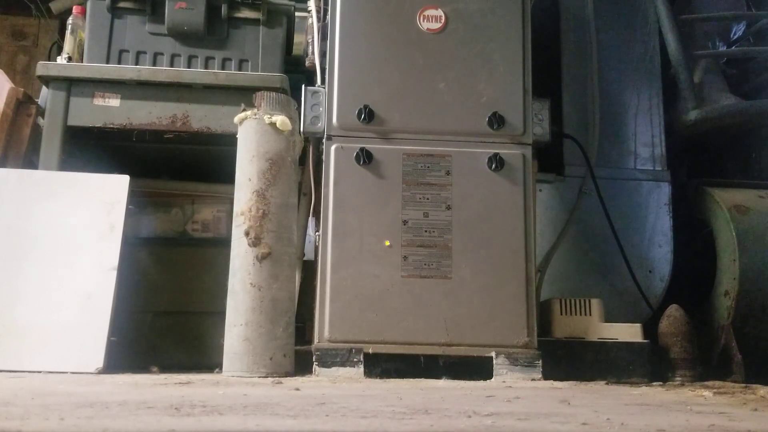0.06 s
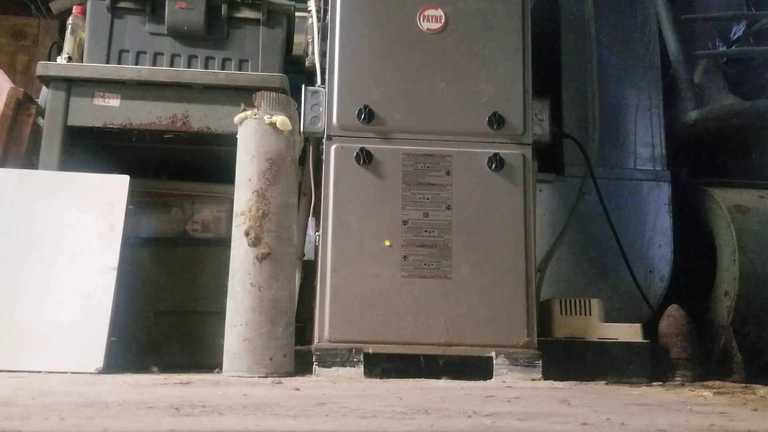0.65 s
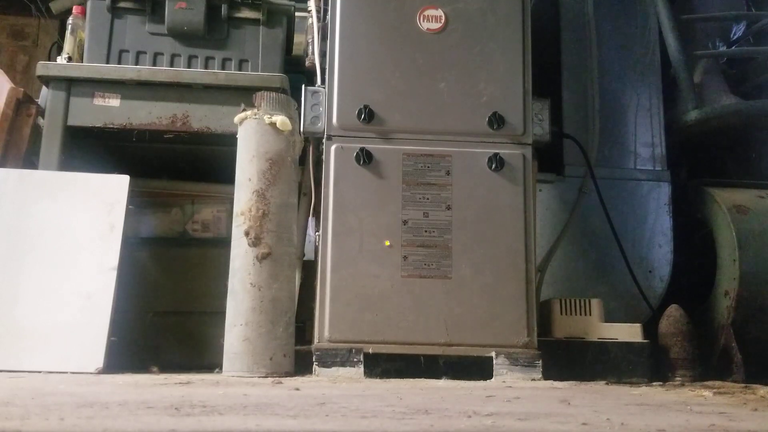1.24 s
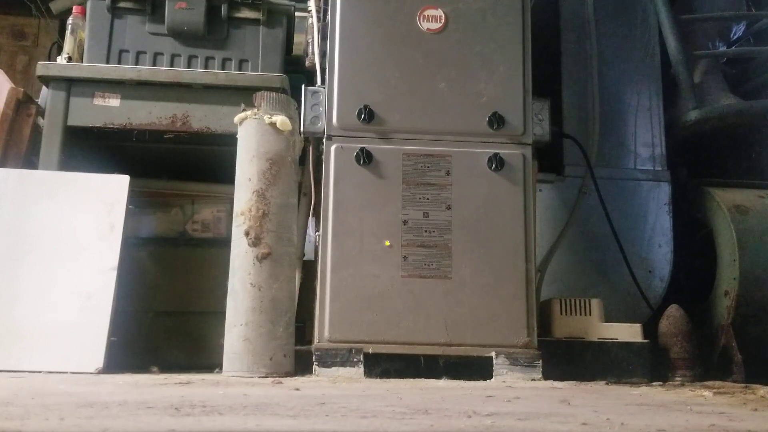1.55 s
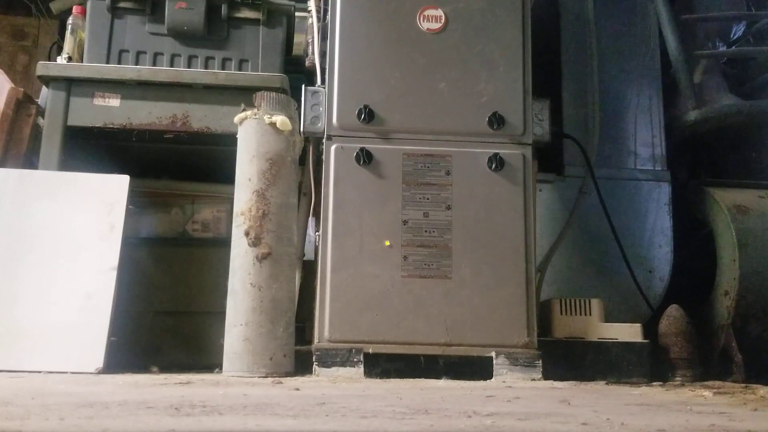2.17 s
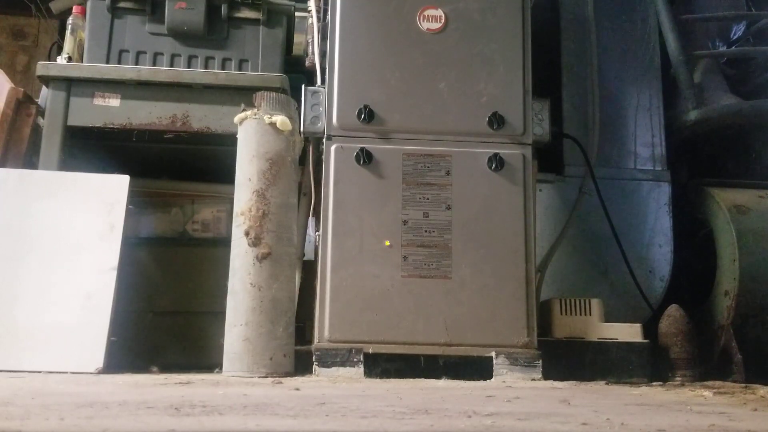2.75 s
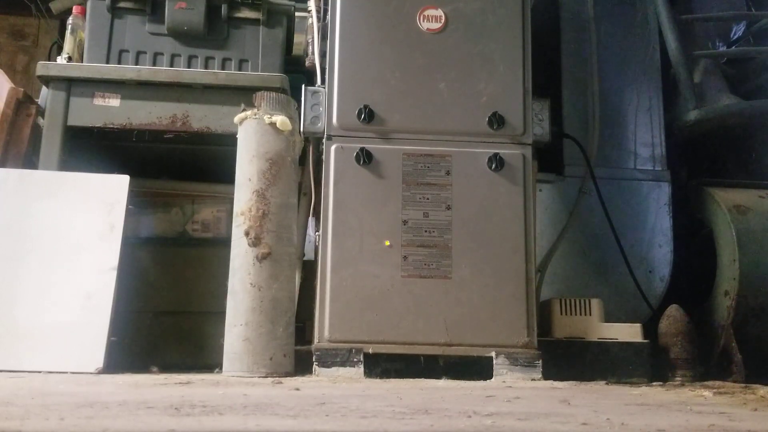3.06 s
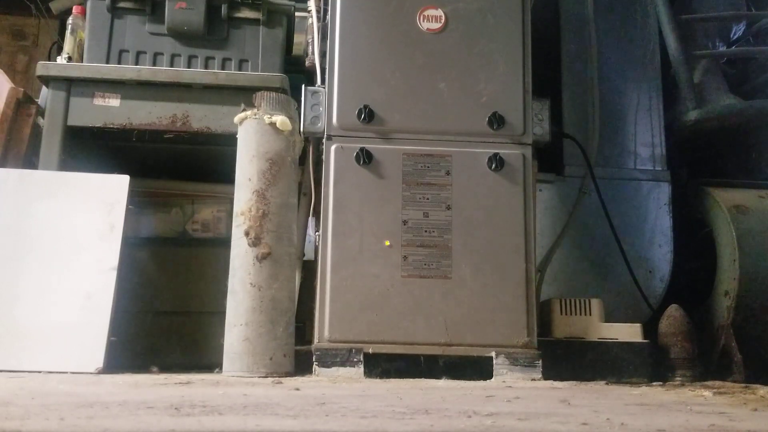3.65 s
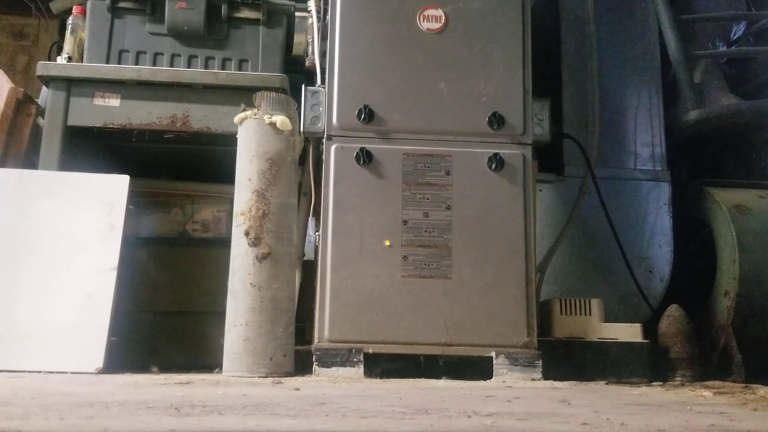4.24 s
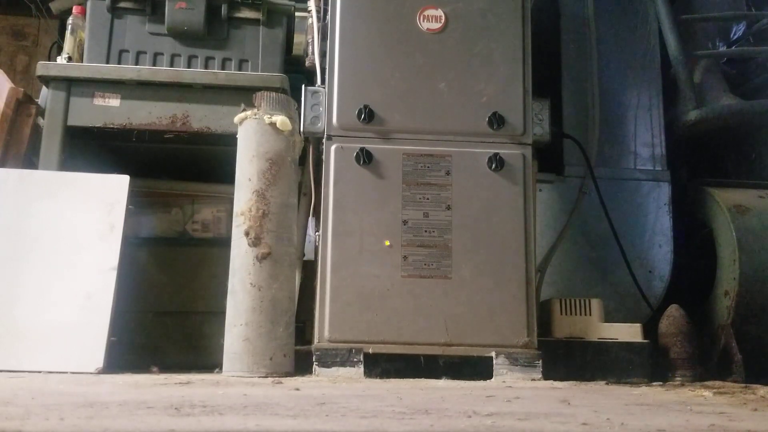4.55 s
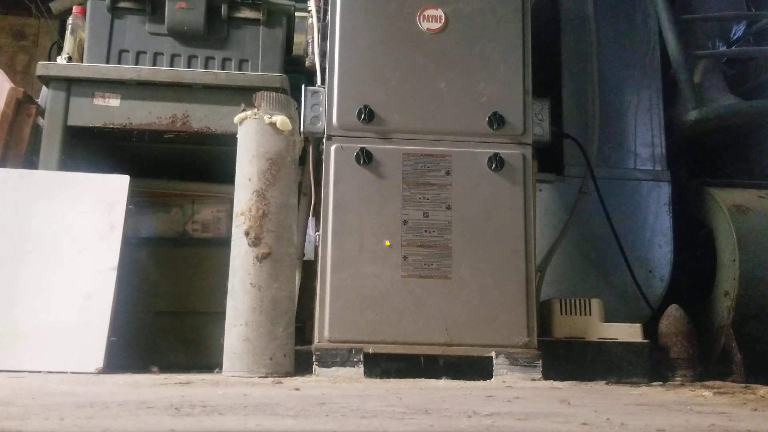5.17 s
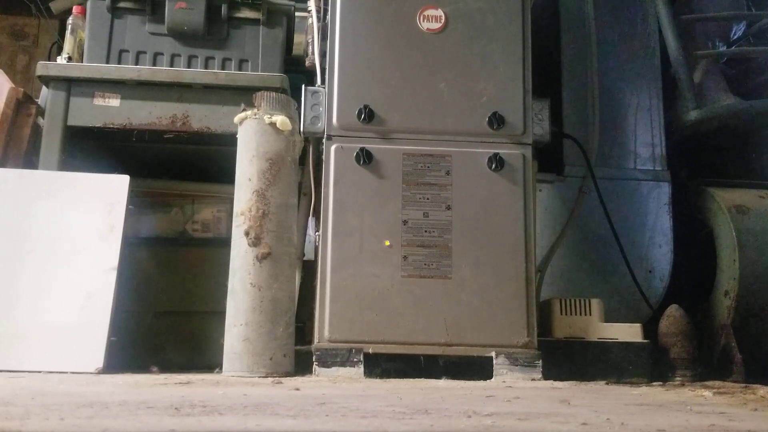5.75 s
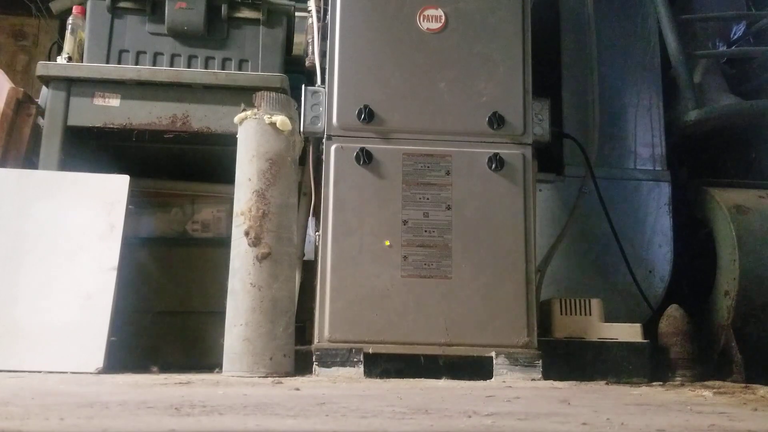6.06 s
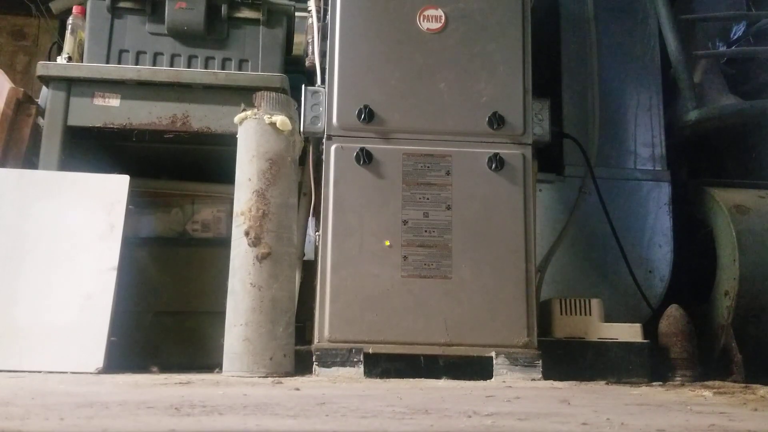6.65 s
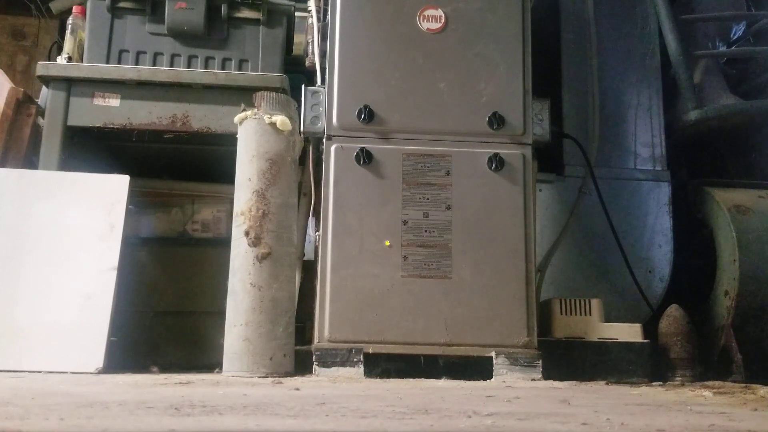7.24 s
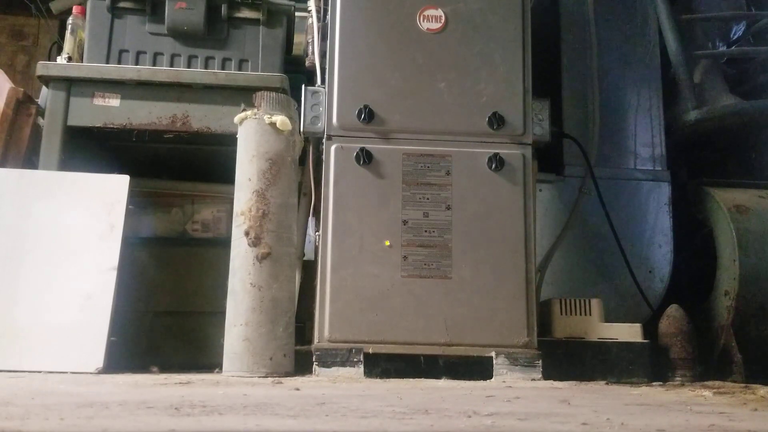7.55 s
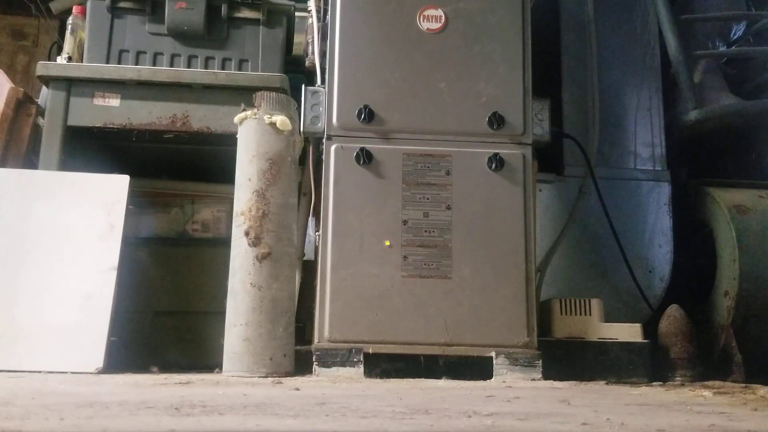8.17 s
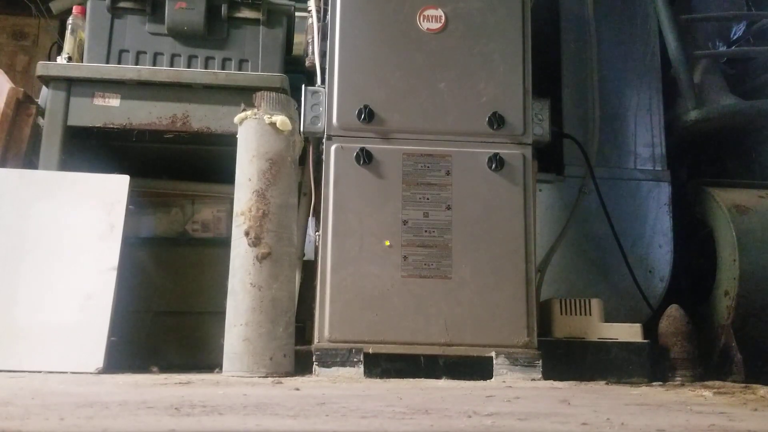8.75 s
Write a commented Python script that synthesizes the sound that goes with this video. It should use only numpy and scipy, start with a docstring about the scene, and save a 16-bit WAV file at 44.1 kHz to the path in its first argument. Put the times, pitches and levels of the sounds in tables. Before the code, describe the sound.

A gas furnace's fan hums steadily in a basement, its bearing ticking lightly over a faint hiss. A little past halfway, a relay and gas valve click, and the gas catches with a deep thump. More metallic clicks follow as the flame flares and spreads, settling into a much louder, hollow, steady roar. It is heard from the floor, a few steps away.

```python
"""Gas furnace burners light and roar in a basement, heard from the floor a few steps away.
First the draught fan hums through the flue and its bearing ticks. A relay and the gas valve click,
the jets hiss and the gas catches with a thump. The flame spreads over the burners and rings the heat
exchanger: a steady, hollow roar. Behind it, a few soft scuffs and a faint hiss."""
import sys
import numpy as np
from scipy import signal
from scipy.fft import rfft, irfft
from scipy.io import wavfile

SR = 44100
rng = np.random.default_rng(int(sys.argv[2]) if len(sys.argv) > 2 else 0)


def to_wav(sig):
    """Store sig (one row per channel, or 1-D mono) as 16-bit WAV at the path in sys.argv[1].

    Samples outside -1..1 are clipped; the rate is SR.
    """
    pcm = np.clip(np.atleast_2d(sig), -1, 1) * 32767
    pcm = np.round(pcm).astype(np.int16)
    wavfile.write(sys.argv[1], SR, pcm.T)  # frames by channels


N = 388080
T, HZ = np.arange(N) / SR, np.fft.rfftfreq(N, 1 / SR)
LIGHT_S, SPREAD_S = 5.85, 6.44  # first burner lights; flame crosses to the rest

# Stereo balance of fire and fan. Each row: frequency in Hz, left minus right in dB.
FIRE_BALANCE = [(60, -1.5), (110, -0.5), (200, 0), (380, -0.5), (700, 1), (1290, -2.5), (2380, 0),
                (4400, 2.0), (8120, -2), (15000, -2)]
FAN_BALANCE = [(60, -2), (110, -0.5), (200, 0.0), (380, 0.5), (700, 1.5), (1290, -2), (2380, -0.5),
               (4400, 4.5), (8120, 2.5), (15000, -3.5)]


def burners(rumble_hz=240, body_hz=540, top_hz=3400, flicker_db=0.87, surge_db=0.47, body_share=0.42):
    """Flames ring the heat exchanger: a rumble, then a flickering roar as they spread."""
    # Combustion noise. Each row: frequency in Hz, base density in dB per Hz.
    spectrum = [(20, -71.5), (31, -68), (42, -58), (100, -54.5), (185, -61), (215, -71.5), (330, -75.5),
                (450, -83), (700, -73), (1000, -82), (1300, -88.5), (1750, -87.5), (2000, -98.5),
                (2500, -100), (3200, -109.8)]
    # Hot exchanger modes. Each row: frequency in Hz, width in Hz, boost in dB.
    exchanger_modes = [(59.2,15.6,13), (82.6,13,7.7), (100.6,9.1,15), (120,20,10.5), (140.9,9.9,11.7),
                       (162.2,8.1,10.8), (183.8,18.6,14.4), (271,21,12), (301.7,13,16), (322,22,13.3),
                       (357.2,22.3,27.6), (392,60,17.4), (474,49,11), (503,6.6,11), (577,41,3.5),
                       (645,37,8.1), (680.7,22,15.15), (764.5,13.5,13.4), (838,12,9), (924,26,8.7),
                       (969,9.1,12.4), (1191,54,5.9), (1356,80,7.4), (1407,23,12.8), (1562,32,8.9),
                       (2057,59,6.4), (2420,98,7.1)]
    fire = air(read(spectrum, HZ) + resonances(exchanger_modes), FIRE_BALANCE)
    rumble, body, roar = (below(fire, hz) for hz in (rumble_hz, body_hz, top_hz))
    size, turbulence_db = flame()
    turbulence = gain_of(turbulence_db + flicker_db * wander(45))  # acts most on the upper bands
    flames = rumble + (body - rumble) * turbulence ** body_share + (roar - body) * turbulence
    return flames * size * gain_of(surge_db * wander(14))


def flame(first_db=-7, full_db=0.52, calm_db=-7.5, stirred_db=1.55, ease_db_per_s=0.43):
    """Flame size as a gain and turbulence in dB: one burner, then all, each step with a flare."""
    swing = 0.8 * flare(LIGHT_S) + flare(SPREAD_S)
    size_db = first_db + (full_db - first_db) * ramp(SPREAD_S, length_s=0.084) + 5.5 * swing
    size_db -= ease_db_per_s * np.maximum(T - SPREAD_S, 0)
    turbulence_db = calm_db + (stirred_db - calm_db) * ramp(SPREAD_S - 0.15, length_s=0.19) + 3.5 * swing
    return ramp(LIGHT_S, length_s=0.23) * gain_of(size_db), turbulence_db


def flare(start_s, delay_s=0.12, period_s=0.45, settle_s=0.19):
    """Gathered gas burns off: the flame overshoots, sags and settles."""
    age_s = np.maximum(T - start_s - delay_s, 0)
    return np.sin(2 * np.pi * age_s / period_s) * np.exp(-age_s / settle_s)


def ignition(boom_hz=230):
    """Gas catches with a bang and a slower boom; puffs push the burner box before and after."""
    # Ignition blast. Each row: frequency in Hz, base density in dB per Hz.
    spectrum = [(25, -66.5), (45, -40.5), (68, -41), (105, -46), (190, -51), (225, -65), (270, -53),
                (400, -50), (480, -58), (600, -73), (760, -63), (940, -68), (1500, -91), (3500, -101.5)]
    # Gas puffs. Each row: start in seconds, peak in dB, frequency in Hz, rise in seconds.
    puffs = [(5.252, -42.5, 305, 0.019), (5.272, -24, 87, 0.026), (5.36, -26.5, 94.3, 0.024),
             (6.207, -24.5, 95, 0.024)]
    blast = air(read(spectrum, HZ), FIRE_BALANCE)
    boom = below(blast, boom_hz)
    bang = blast - boom
    out = boom * burst(db=-1.5, rise_s=0.031, sag_db_per_s=3, fade_db_per_s=188)
    out += bang * burst(db=0, rise_s=0.025, sag_db_per_s=45, fade_db_per_s=280)
    t = T[:SR // 2]
    for start_s, db, hz, rise_s in puffs:
        swell = (t / rise_s * np.exp(1 - t / rise_s)) ** 3
        add(out, start_s, gain_of(db) * swell * np.sin(2 * np.pi * hz * t))
    return out


def burst(db, rise_s, sag_db_per_s, fade_db_per_s, start_s=5.833, burn_s=0.18):
    """Blast envelope: swells, sags while the gas pocket burns, dies away."""
    age_s = np.maximum(T - start_s, 0)
    fall_db = sag_db_per_s * np.minimum(age_s, burn_s) + fade_db_per_s * np.maximum(age_s - burn_s, 0)
    return ramp(start_s, rise_s) ** 2 * gain_of(db - fall_db)


def fan(shaft_hz=51.11, mains_hz=60, top_hz=3500, rush_db=-0.67, sway_db=0.52, hum_db=-0.4):
    """Turbulent draught rings the flue; shaft, ten blades and motor add clean tones."""
    # Moving air. Each row: frequency in Hz, base density in dB per Hz.
    draught = [(20, -91.5), (33, -81.5), (42, -74.5), (100, -69.5), (185, -83), (330, -89), (460, -81),
               (560, -96.5), (700, -90.5), (950, -96), (1200, -101.7), (1350, -109.1), (2000, -112.0),
               (3200, -116.4)]
    # Flue modes. Each row: frequency in Hz, width in Hz, boost in dB.
    flue_modes = [(41.6, 7.4, 5.4), (66.7, 6.3, 16.3), (71.4, 3.7, 11.7), (91.9, 3.9, 8.7),
                  (102.3, 4.9, 20.2), (128.6, 26, 10), (139.6, 8.4, 23.3), (161.2, 6, 22.8),
                  (172, 7.1, 28.5), (204, 15.5, 19.9), (244.4, 8.3, 20.4), (267, 10.7, 17.6),
                  (288.3, 38.7, 13.7), (349.7, 19, 20.3), (385.5, 46, 12.5), (415.2, 12.6, 11.9),
                  (615, 13, 7.1), (764.7, 27, 11.5), (914, 24, 7.5), (1603, 170, 4.4)]
    # Shaft and blade tones. Each row: multiple of shaft speed, base level in dB.
    shaft_orders = [(1, -50), (2, -49.5), (10, -61), (20, -69), (30, -85.5), (40, -90.5)]
    # Magnetic motor hum. Each row: multiple of mains frequency, base level in dB.
    motor_orders = [(8, -74), (12, -76.5)]
    rolloff_db = 10 * np.log10(1 + (HZ / top_hz) ** 8)
    rush = air(read(draught, HZ) + resonances(flue_modes) - rolloff_db, FAN_BALANCE)
    rotor = tones(shaft_hz, shaft_orders, drift=0.00037, flutter_db=0.65)
    motor = tones(mains_hz, motor_orders, drift=0, flutter_db=-1.5)
    return rush * gain_of(rush_db + sway_db * wander(1.2)) + (rotor + motor) * gain_of(hum_db)


def clicks(crack_s=0.0012, valve_db=-6):
    """Relays, valve and sheet metal snap: a crack, then cabinet and room ring, treble dying first."""
    # Each row: start in seconds, body, ring, top and crack gains in dB, share of valve ring from 0 to 1.
    snaps = [(5.223, -14, -4.5, 0.5, -14, 0.9), (5.2397, -5.5, 1.5, -5, -15, 0.9),
             (5.8534, -1, 4.5, 4.5, -20, 0), (5.886, 4.5, -0.5, -1, -14, 0.2),
             (5.999, -12, -17, -34, -12, 0.1), (6.0753, -6, -6.5, -8, -6, 0.1),
             (6.636, -9, -14.5, -20, 0, 0.1), (6.6697, -1, 0, -1, -8, 0), (6.722, -23, -14.5, -17.5, -9, 0)]
    # Snap spectrum. Each row: frequency in Hz, base density in dB per Hz.
    spectrum = [(150, -80), (500, -67.5), (1300, -76.5), (2200, -77), (4000, -81), (6600, -75), (7600, -86),
                (9700, -87), (11500, -82), (12900, -74), (14400, -80), (16000, -77)]
    # Valve modes. Each row: frequency in Hz, width in Hz, boost in dB.
    valve_modes = [(1255, 200, 14.5), (3490, 450, 12.5), (4200, 440, 9), (5540, 370, 11), (6350, 500, 1),
                   (7500, 400, 13.5), (9440, 1200, 16.5), (13500, 900, 0)]
    # Each row: frequency in Hz, left minus right in dB.
    balance = [(60, -1), (110, -0.5), (200, 1), (380, -5.5), (700, -4), (1290, -2), (2380, 0), (4400, 1.5),
               (8120, -1), (15000, -2)]
    # Basement reverberation. Each row: frequency in Hz, T60 in seconds.
    room_t60 = [(200, 0.43), (1500, 0.43), (3000, 0.31), (6000, .2), (14000, 0.15)]
    out, t = np.zeros((2, N)), T[:SR // 2]
    for start_s, body_db, ring_db, top_db, crack_db, valve_share in snaps:
        hz, age_s, noise = signal.stft(rng.standard_normal((2, len(t))), SR, nperseg=256)
        band_gains = [(2200, body_db), (4500, ring_db), (7500, ring_db), (12000, top_db)]
        colour_db = read(spectrum, hz) + read(band_gains, hz)
        colour_db += np.clip(valve_share, 0, 1) * (resonances(valve_modes, hz) + valve_db)
        stereo_db = colour_db + np.outer([0.5, -0.5], read(balance, hz))
        decay_db = 60 * age_s / read(room_t60, hz)[:, None]
        shaped = noise * gain_of(stereo_db[..., None] - decay_db)
        ring = signal.istft(shaped, SR, nperseg=256)[1][:, :len(t)] * np.sqrt(SR / 2)
        add(out, start_s, ring * (1 + gain_of(crack_db) * np.exp(-t / crack_s)))
    return out


def jets(open_db=-0.5, extra_db=2.3, open_s=0.07, ease_s=0.45):
    """Gas hisses from the jets, a little harder until all burners are alight."""
    # Escaping gas. Each row: frequency in Hz, base density in dB per Hz.
    spectrum = [(500, -130), (3400, -115), (3600, -106), (3850, -113), (6000, -113), (9000, -113),
                (11000, -115), (12700, -110), (16000, -111)]
    flow_db = open_db + extra_db * (1 - ramp(SPREAD_S, ease_s))
    return air(read(spectrum, HZ), FIRE_BALANCE) * ramp(LIGHT_S, open_s) * gain_of(flow_db)


def bearing(swell_s=0.015, uneven_db=2.5, ticks_per_s=11, small_tick_db=5.0, spread_db=2.5, jitter=0.4):
    """The fan bearing rubs and ticks in a loose rhythm; each high mode wavers on its own."""
    # Strongest ticks. Each row: start in seconds, level over the steady rub in dB.
    strong_ticks = [(.137, 15), (.68, 18), (.755, 17), (1.673, 15), (2.368, 11), (2.935, 17), (4.24, 12),
                    (5.64, 12.5), (6.038, 16), (7.775, 15)]
    # Bearing modes. Each row: frequency in Hz, width in Hz, base density in dB per Hz.
    modes = [(4700, 450, -117), (4877, 130, -109), (5740, 260, -118), (8730, 50, -120)]
    tick_count = np.floor(np.cumsum(ticks_per_s * np.exp(jitter * wander(9))) / SR)
    onsets = np.diff(tick_count, prepend=0) > 0
    ticks = onsets * gain_of(small_tick_db + spread_db * rng.uniform(-1.8, 2, N))
    for start_s, db in strong_ticks:
        ticks[round(start_s * SR)] = gain_of(db) - 1
    age = T[:SR // 4] / swell_s
    rub = 1 + signal.oaconvolve(ticks, age * np.exp(1 - age))[:N]  # ticks swell fast and ring out
    ring = np.zeros((2, N))
    for hz, width_hz, db in modes:
        mode_db = db - 20 * np.log10(1 + (2 * (HZ - hz) / width_hz) ** 2)
        ring += air(mode_db, FAN_BALANCE) * gain_of(uneven_db * wander(14))
    return rub * ring


def scuffs():
    """Soft mid-range scuffs, and a swish as the flame flares."""
    # Scuff noise. Each row: frequency in Hz, base density in dB per Hz.
    spectrum = [(300, -100), (800, -89), (1500, -98.5), (2200, -99), (2700, -101.5), (3400, -107),
                (4500, -110), (6500, -111), (9000, -122), (16000, -130)]
    # Each row: centre in seconds, gain in dB, half length in seconds.
    swells = [(1.232, -0.5, 0.021), (1.276, 0.5, 0.044), (2.943, -8, .03), (6.582, 9.5, 0.052)]
    envelope = sum(gain_of(db) * np.exp(-((T - at_s) / half_s) ** 2) for at_s, db, half_s in swells)
    return air(read(spectrum, HZ), FIRE_BALANCE) * envelope


def hiss():
    """Faint, steady treble hiss."""
    # Noise floor. Each row: frequency in Hz, density in dB per Hz.
    spectrum = [(1000, -126), (3200, -121), (4000, -116.5), (4700, -111.5), (6700, -110.5), (7300, -117.5),
                (9700, -117), (11200, -112.5), (12400, -108), (14000, -110.5), (16000, -110.5)]
    return air(read(spectrum, HZ), FAN_BALANCE)


def air(density_db, balance):
    """Stereo noise; the room leaves the bass alike in both ears and the treble unrelated."""
    # Room coherence. Each row: frequency in Hz, left-right correlation.
    coherence = [(60, 0.99), (120, 1), (240, 0.95), (480, 0.88), (950, 0.61), (1890, -0.13), (3770, 0.18),
                 (7520, -0.053), (15000, 0.042)]
    left, other = rfft(rng.standard_normal((2, N)))
    alike = np.clip(read(coherence, HZ), -1, 1)
    right = alike * left + np.sqrt(1 - alike ** 2) * other
    lean_db = read(balance, HZ) / 2
    pair = np.array([left * gain_of(lean_db), right * gain_of(-lean_db)])
    return irfft(pair * gain_of(density_db) * np.sqrt(SR / 2), N)


def tones(base_hz, orders, drift, flutter_db, lag_s=0.0002):
    """Fluttering multiples of one speed; they reach the right ear lag_s later."""
    turns = np.cumsum(base_hz * (1 + drift * wander(1.5))) / SR - np.array([[0], [lag_s * base_hz]])
    out = np.zeros((2, N))
    for order, db in orders:
        amplitude = np.sqrt(2) * gain_of(db + flutter_db * wander(4.7))
        out += amplitude * np.sin(2 * np.pi * (round(order) * turns + rng.random()))
    return out


def resonances(modes, at_hz=HZ):
    """Gain in dB of steep resonant peaks on a flat floor."""
    peaks = (gain_of(db) ** 2 / (1 + (2 * (at_hz - hz) / width_hz) ** 2) ** 2
             for hz, width_hz, db in modes)
    return 10 * np.log10(1 + sum(peaks))


def wander(rate_hz, size=4096):
    """Smooth random drift of rms 1."""
    hz = HZ[:size // 2 + 1]
    drift = irfft(rfft(rng.standard_normal(size)) * np.exp(-(hz / rate_hz) ** 2) * (hz > 0), size)
    return np.interp(T, np.linspace(0, T[-1], size), drift / drift.std())


def below(x, hz):
    """Steep zero-phase low-pass."""
    return irfft(rfft(x) / (1 + (HZ / hz) ** 8), N)


def ramp(start_s, length_s):
    """Linear rise from 0 to 1, then hold."""
    return np.clip((T - start_s) / length_s, 0, 1)


def read(points, hz):
    """A curve's value at hz, on a log-frequency axis."""
    point_hz, values = np.transpose(points)
    return np.interp(np.log(hz + 1), np.log(point_hz + 1), values)


def gain_of(db):
    """Decibels to amplitude."""
    return 10 ** (np.asarray(db) / 20)


def add(mix, start_s, sound):
    """Mixes a sound in at start_s."""
    part = mix[:, round(start_s * SR):][:, :sound.shape[-1]]
    part += sound[..., :part.shape[1]]


def scene():
    """The whole furnace over a faint hiss."""
    return fan() + bearing() + clicks() + ignition() + burners() + jets() + scuffs() + hiss()


def record(dry):
    """Brief fades at both ends and a treble cut."""
    edge_hz = 15760
    lowpass = signal.firwin(1023, edge_hz, window=("kaiser", 9), fs=SR)
    fades = signal.windows.tukey(N, 0.003)
    return signal.oaconvolve(dry * fades, lowpass[None], "same", axes=1)


dry = scene()
out = record(dry)
to_wav(out)
```